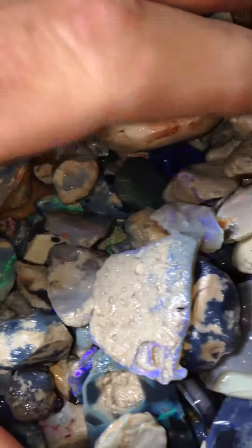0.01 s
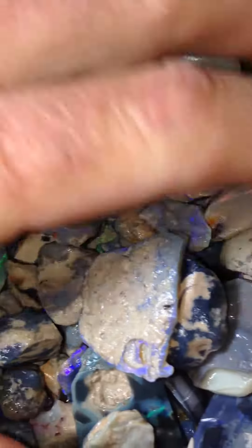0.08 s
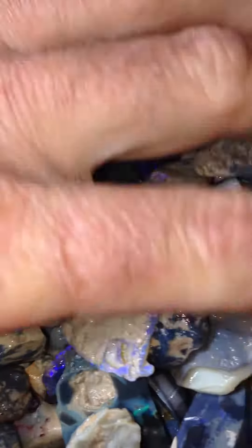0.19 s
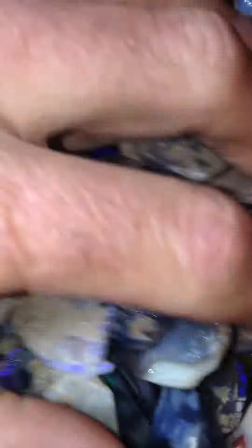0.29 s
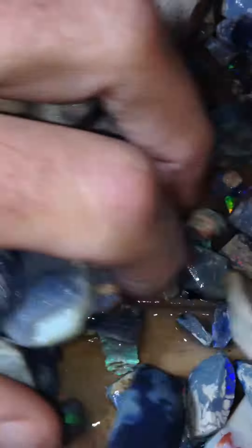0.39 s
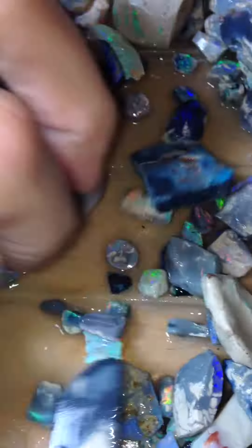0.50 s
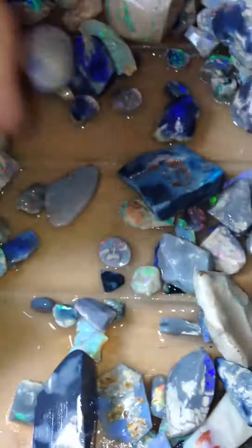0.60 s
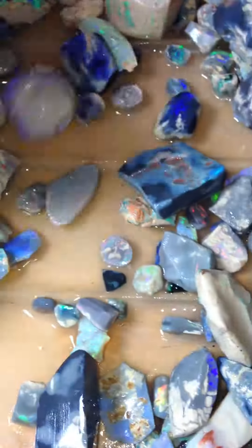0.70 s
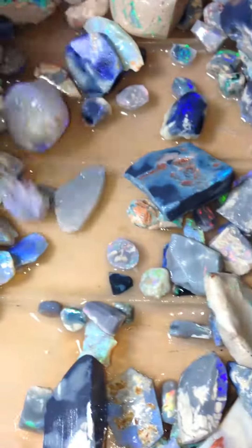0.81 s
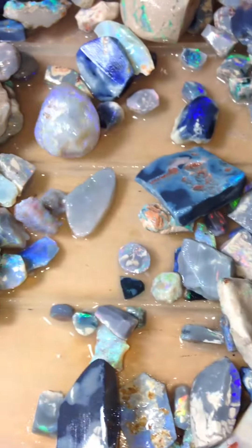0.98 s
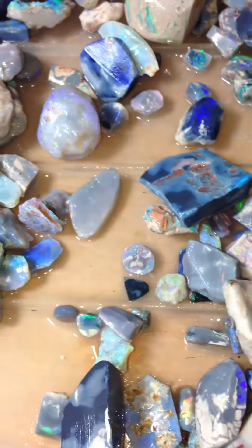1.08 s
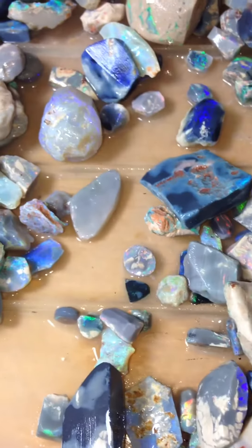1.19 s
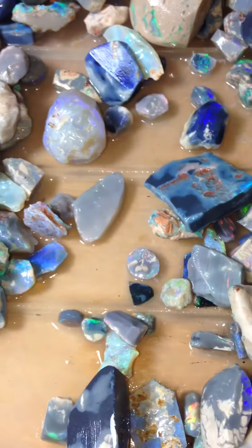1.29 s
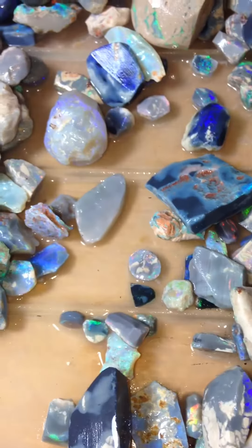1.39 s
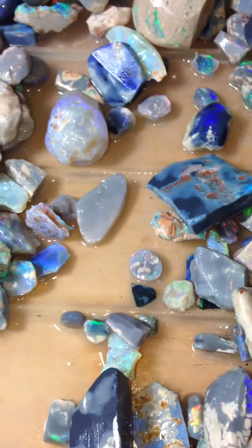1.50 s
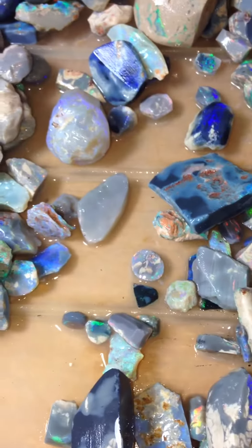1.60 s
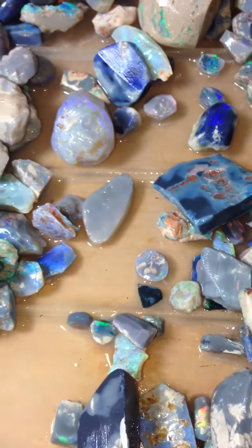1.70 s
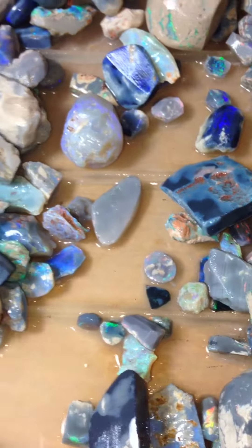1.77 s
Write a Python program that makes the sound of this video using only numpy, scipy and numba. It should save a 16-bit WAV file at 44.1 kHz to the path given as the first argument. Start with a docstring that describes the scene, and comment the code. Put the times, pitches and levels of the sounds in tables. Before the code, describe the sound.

Hard stones click quietly at first, with sharper clacks and a brief ringing scrape from 0.2 seconds. At about 0.37 a dense, loud, grating rush of stones sweeps over the hollow wooden box floor, easing by 0.65. Bright separate clacks and rattles follow, with very high glassy pings around 0.9 to 1.2. It thins near 1.3, then a smaller cluster clicks around 1.45 to 1.6 and sparse ticks remain. Close, small room, faint hiss.

```python
"""Hard stones clatter and grate as a hand rakes them over the floor of a wooden box, close to a phone.
Thousands of tiny collisions, each a decaying sine, make the raking; a dragged stone rings through it.
Loud clacks stand out, each amid a fading rattle, and a glassy chip pings very high as it tumbles.
The box floor drums and booms on its own modes, in a small room with a short tail and faint hiss."""
import sys
import numpy as np
from scipy import signal
from scipy.io import wavfile
from numba import njit

SR = 44100
rng = np.random.default_rng(int(sys.argv[2]) if len(sys.argv) > 2 else 0)


def persist_wave(psi):
    """Save psi, clipped to +-1, as 16-bit WAV."""
    counts = np.round(np.clip(psi, -1, 1) * 32767).astype(np.int16)
    wavfile.write(sys.argv[1], SR, np.atleast_2d(counts).T)


def gain_from_db(level_db):
    """Convert decibel levels to linear amplitude factors (20 dB per decade)."""
    decades = np.asarray(level_db, float) / 20
    return 10 ** decades


N = 79380  # 1.8 s

# Strength of the raking: (time [s], large stones [dB], middle stones [dB], small stones [dB], grit [dB],
# drumming of the box floor [dB], boom of the box floor [dB])
RAKE_LEVELS = [(0.0, -40, -41, -38, -39.5, -50, -52), (0.084, -32, -36, -36.5, -42.5, -60, -47),
               (0.124, -42, -51, -47.5, -68, -53, -54), (0.19, -40, -50.5, -47.5, -53, -54, -49),
               (0.23, -34, -29, -29.5, -38, -62, -60), (0.25, -25.5, -31, -32.5, -38, -52, -48),
               (0.32, -38.5, -27.5, -32, -43, -42, -49), (0.386, -23, -15.5, -16.5, -20.5, -31, -38.5),
               (0.456, -24.5, -21, -18.5, -23, -38.5, -36), (0.51, -26.5, -20.5, -19, -23.5, -35.5, -38),
               (0.576, -29, -26.5, -23, -31, -32, -40), (0.65, -31.5, -28, -24.5, -33, -36, -49),
               (0.676, -33, -32.5, -32, -33, -45, -40), (0.7, -38, -32, -30.5, -35, -35.5, -53),
               (0.732, -36.5, -34, -31.5, -31, -41, -53), (0.776, -34, -32, -27, -30.5, -36.5, -66),
               (0.826, -32.5, -31, -25.5, -32, -31, -42), (0.852, -33.5, -32, -28.5, -31, -39, -44),
               (0.982, -33.5, -34, -23.5, -32.5, -41, -62), (1.002, -43, -30.5, -32.5, -31, -32, -63),
               (1.066, -42, -28.5, -26.5, -33, -29.5, -66), (1.082, -26.5, -34, -34, -33, -68, -67),
               (1.098, -36.5, -33.5, -35, -31.5, -34.5, -53), (1.212, -36.5, -32.5, -30, -39, -55, -51.5),
               (1.252, -45, -40.5, -41, -56, -40.5, -42), (1.288, -40.5, -40.5, -43.5, -87, -59, -54),
               (1.418, -46.5, -46.5, -48.5, -56, -47, -55), (1.458, -45, -37, -36.5, -37, -42, -40),
               (1.518, -44, -36, -29, -38, -45.5, -50), (1.584, -40, -34.5, -39, -53, -52, -45),
               (1.608, -33, -40.5, -32.5, -54, -34.5, -50), (1.634, -46.5, -38, -44, -60, -60, -50),
               (1.668, -37.5, -36.5, -35.5, -62, -34.5, -50), (1.704, -45.5, -44, -48, -73, -60, -53),
               (1.758, -41, -36.5, -37.5, -60, -54, -59), (1.8, -41, -36, -46, -42, -56, -46)]
# Modes of the wooden box floor: (frequency [Hz], relative level [dB], decay by 60 dB [s])
BOX_MODES = [(132, -10, 0.29), (173, -8.5, 0.12), (280, -9, 0.032), (318, -38, 0.029), (418.4, -2, 0.048),
             (494, -3, 0.033), (640, -32, 0.059), (830, 3.5, 0.027), (867, 5.5, 0.061), (1129, 10.5, 0.021)]


@njit
def rings(start, hz, t60, size):
    """Sum of decaying sines, one for each collision; t60 is the time to fall by 60 dB."""
    out = np.zeros(N + 1)
    for k in range(len(start)):
        turn = np.exp(complex(-np.log(1000) / (t60[k] * SR), 2 * np.pi * hz[k] / SR))
        state = complex(size[k], 0.)
        first = max(int(start[k] * SR), 0)
        for j in range(first, min(N, first + int(t60[k] * SR))):
            out[j] += state.imag
            state *= turn
    return out[:N]


def struck(modes, times, sizes):
    """Every blow rings all modes of one object, each with a fresh strength."""
    hz, db, t60 = np.array(modes, float).T
    blows, count = len(times), len(hz)
    fresh = 1 + .25 * rng.standard_normal((blows, count))
    strength = sizes[:, None] * gain_from_db(db) * fresh
    return rings(np.repeat(times, count), np.tile(hz, blows), np.tile(t60, blows), strength.ravel())


def unit(x):
    """Scale to rms 1."""
    return x / np.sqrt(np.mean(x ** 2))


def rake_gain(column):
    """Gain over time from a level column of the raking table."""
    table = np.array(RAKE_LEVELS)
    return gain_from_db(np.interp(np.arange(N) / SR, table[:, 0], table[:, column]))


def thin(x):
    """High-pass, as small stones radiate little low sound."""
    return signal.lfilter(*signal.butter(2, 440, "high", fs=SR), x)


def muffle(x, hz):
    """Gentle one-pole low-pass."""
    return signal.lfilter(*signal.butter(1, hz, fs=SR), x)


def rake():
    """Dense random collisions for each stone size, bunched by a shared surge; the box floor drums and booms."""
    # Stone sizes: (lowest pitch [Hz], highest pitch [Hz], collision rate [1/s],
    # mean cycles in two amplitude decay constants, size spread when calm [dB])
    stone_sizes = [(713, 1500, 1200, 4.3, 1), (1500, 4500, 2200, 4.8, 2.5), (4280, 9110, 3500, 3.24, 3.5),
                   (8330, 12550, 4000, 2.3, 5)]
    surge_step_db, surge_per_s = 2.5, 70  # collisions come in bunches
    rush_db, rush_soft_db, rush_grit = -31.5, 4.5, 0.63  # centre and softness of the change, least spread factor
    pitch_skew = 0.98  # below 1 the higher pitches of a size class are slightly commoner
    knots = rng.standard_normal(400)
    table = np.array(RAKE_LEVELS)

    def calm(t):
        """When many stones move at once (loud middle stones), the factor falls and sizes even out."""
        middle_db = np.interp(t, table[:, 0], table[:, 2])
        return rush_grit + (1 - rush_grit) / (1 + np.exp((middle_db - rush_db) / rush_soft_db))

    def surge_db(t):
        """Random wander of collision strength."""
        return surge_step_db * np.interp(t * surge_per_s, np.arange(len(knots)), knots)

    stones = 0
    for k, (lo, hi, rate, cycles, spread_db) in enumerate(stone_sizes):
        u = rng.random((12000, 4))
        t = np.cumsum(-np.log(1 - u[:, 0])) / rate
        hz = np.minimum(lo * (hi / lo) ** (u[:, 1] ** pitch_skew), .45 * SR)
        t60 = (.5 + u[:, 3]) * cycles * np.log(1000) / (2 * hz)
        size_db = calm(t) * (surge_db(t) - spread_db * np.log(1 - .993 * u[:, 2]))
        # a wide spread raises the mean power; this takes the rise back
        share = np.clip(calm(t) * spread_db * np.log(10) / 10, 0, .9)
        size = gain_from_db(size_db) * np.sqrt(1 - share) * (t < N / SR)
        stones = stones + unit(thin(rings(t, hz, t60, size))) * rake_gain(column=k + 1)

    u = rng.random((1500, 2))
    t = u[:, 0] * N / SR
    size = gain_from_db(-1.5 * np.log(1 - u[:, 1]))
    drum = unit(struck(BOX_MODES[2:6], t, size * gain_from_db(surge_db(t)))) * rake_gain(column=5)
    boom = unit(struck(BOX_MODES[:2], t, size)) * rake_gain(column=6)
    return stones + drum + boom


def drag():
    """Stick-slip jolts ring the dragged stone; flat stones of one size add a shared colour to the raking."""
    # A large stone dragged over the floor: (time [s], ringing pitch [Hz], level [dB])
    drag_path = [(.19, 950, -41), (.215, 1070, -37), (.25, 1155, -20), (.26, 1270, -42),
                 (.285, 1500, -24.5), (.3, 1500, -40), (.36, 1150, -33), (.44, 1110, -24),
                 (0.481, 1170, -35), (.545, 1177, -26), (0.601, 1160, -48)]
    stone_t60_s, stone_scatter = 0.029, 0.042  # scatter is of the log pitch
    slab_hz, slab_scatter, slab_t60_s = 3027, 0.075, 0.016
    slab_db = -7  # relative to the middle stones
    time, pitch, level = np.array(drag_path, float).T
    u, g = rng.random((3000, 3)), rng.standard_normal((3000, 2))
    t = u[:, 0] * N / SR
    hz = np.interp(t, time, pitch) * np.exp(stone_scatter * g[:, 0])
    level_db = np.interp(np.arange(N) / SR, time, level, left=-90, right=-90)
    stone = unit(rings(t, hz, stone_t60_s + 0 * t, u[:, 1] ** 2)) * gain_from_db(level_db)
    slabs = rings(t, slab_hz * np.exp(slab_scatter * g[:, 1]), slab_t60_s + 0 * t, u[:, 2] ** 4)
    return stone + unit(slabs) * gain_from_db(slab_db) * rake_gain(column=2)


def clacks():
    """A sharp main contact with three weaker short modes, amid a cluster of small ones; the box is knocked too."""
    # Clacks: (time [s], main mode level [dB], main pitch [Hz], low rattle level [dB],
    # middle rattle level [dB], high rattle level [dB], rattle fade to 1/e [ms])
    clack_table = [(0.0314, -19, 2020, -31.5, -32, -39, 3.8), (0.0459, -26, 4470, -35, -31, -35, 4),
                   (0.1272, -31, 3790, -56, -46, -48, 5), (0.1337, -34, 6680, -54, -50, -54, 3.2),
                   (0.1564, -26, 6250, -36, -36, -39, 6.9), (0.1627, -20, 10060, -33, -42, -28.5, 3.5),
                   (0.1998, -21, 1680, -35, -27, -38, 7.4), (0.2145, -13, 2350, -38, -31, -34, 10),
                   (0.2322, -18, 3790, -49, -35, -38, 7), (0.2482, -28, 1510, -27, -23.5, -26, 7.8),
                   (0.2545, -16, 4350, -26, -27, -30, 6.4), (0.264, -12, 8100, -30, -34, -31, 7.6),
                   (0.3011, -11, 2840, -30, -21.5, -22, 6.2), (0.3051, -9.5, 2400, -23.5, -22, -25, 5.5),
                   (0.3306, -20, 2580, -35, -26, -35, 5), (0.352, -14, 2100, -23.5, -14, -22, 7.7),
                   (0.3553, -8, 2090, -30, -27, -16, 6.1), (0.368, -5, 1670, -25, -19, -13, 3.7),
                   (0.6019, -7, 5600, -28, -19.5, -23, 5), (0.6223, -8, 3010, -23.5, -16.5, -13.5, 4.6),
                   (0.701, -22, 1560, -24, -25.5, -27, 4.5), (0.7261, -15, 2920, -30, -37, -28, 4.6),
                   (0.7473, -15.5, 3040, -28, -31, -32, 5.6), (0.7945, -8, 7750, -39, -34, -27, 2.3),
                   (0.8191, -11, 3100, -24, -41, -29, 6.2), (0.8845, -15, 6850, -27.5, -30, -19.5, 5.9),
                   (0.8933, -16, 6840, -41, -37, -30, 3.1), (0.922, -11, 6800, -37, -28, -30, 3.2),
                   (0.9285, 2, 8450, -35, -20.5, -18.5, 3.9), (0.933, -12, 3040, -25, -27, -34, 5.6),
                   (0.9592, -19, 5190, -27, -20, -24, 6.4), (0.9798, -11, 4500, -24, -32, -25, 3.3),
                   (1.0012, -26, 1640, -22, -18.5, -27, 6.1), (1.0105, -7, 1510, -27, -27, -19.5, 7.4),
                   (1.0263, -7, 8300, -33, -34, -21.5, 13), (1.0334, -18, 5340, -34, -31, -25, 5),
                   (1.0482, -15, 7100, -26, -37, -19.5, 5), (1.083, -11, 8100, -31, -20, -19.5, 2.9),
                   (1.0916, -13, 2300, -32, -32, -25, 6), (1.1066, -16, 4480, -25.5, -29, -34, 5.6),
                   (1.1491, -12, 6850, -38, -29, -22.5, 5), (1.1676, -16.5, 5400, -24, -20.5, -25.5, 15),
                   (1.2001, -15, 1960, -31, -29, -36, 5.7), (1.2188, -22, 4440, -41, -33, -40, 5),
                   (1.2318, -19, 3360, -34.5, -18, -39, 5.8), (1.2338, -10.5, 5700, -29, -29, -29, 4.3),
                   (1.2827, -19, 1900, -36.5, -44, -56, 5), (1.2952, -17, 5900, -37, -24, -33, 4.6),
                   (1.3394, -22, 4260, -32, -29.5, -41, 5), (1.3539, -29, 2640, -35, -36, -60, 6.8),
                   (1.4073, -25, 9000, -49, -40, -40, 7.8), (1.4287, -12.5, 7170, -41, -33, -29, 5.2),
                   (1.4411, -26, 2570, -30, -22.5, -30, 5), (1.4552, -7.5, 1870, -27, -27.5, -30, 5.7),
                   (1.4675, -14, 1800, -27, -25, -28, 2.9), (1.485, -10, 5560, -31.5, -32, -26, 4.6),
                   (1.5059, -4, 11400, -28.5, -31, -17, 2.8), (1.5229, -17, 5630, -29, -18.5, -29, 5),
                   (1.5332, -11, 6700, -27, -36, -32, 5), (1.546, -12, 3550, -30, -20, -32, 5.8),
                   (1.5504, -9, 5600, -32, -24, -25, 5.8), (1.5745, -16, 4160, -31.5, -47, -49, 5),
                   (1.6061, -26, 1540, -46, -30, -35, 4.1), (1.6406, -17, 9350, -33.5, -39, -41, 5),
                   (1.6598, -14.5, 2180, -32.5, -41, -46, 5), (1.6659, -18, 1850, -30, -20, -46, 2.3),
                   (1.7055, -24.5, 3050, -39.5, -39, -37, 7.8), (1.7235, -17.5, 3800, -42, -38, -40, 5),
                   (1.737, -22.5, 2400, -35, -37, -31.5, 5.8), (1.7575, -18, 4370, -40, -29, -44, 4),
                   (1.7833, -16, 2150, -28, -20.5, -26.5, 5)]
    # Rattle pitch ranges: (lowest [Hz], highest [Hz], one contact over the rattle level [dB], decay by 60 dB [s])
    rattle_bands = [(620, 1800, 2, .009), (1850, 5800, 6, 0.0061), (5100, 13750, 10, 0.004)]
    t60_at_4khz_s, pitch_scatter = 0.0034, 0.423  # scatter is of the log pitch
    rattle_span_s, lead_in = .018, .2  # lead_in: share of the contacts that come before the main one
    knock_db = -9.5  # box knock relative to the low rattle level
    t, db, hz, *rattle_db, fade_ms = np.array(clack_table, float).T[:, :, None]
    g = rng.standard_normal((len(t), 4))
    g[:, 0] = 0  # the main mode keeps its pitch
    pitch = np.clip(hz * np.exp(pitch_scatter * g), 800, 14000)
    size = gain_from_db(db + np.array([0, -16.5, -20, -13.5]))
    t60 = t60_at_4khz_s * np.sqrt(4000 / pitch)
    out = rings((t + 0 * g).ravel(), pitch.ravel(), t60.ravel(), size.ravel())
    for level_db, (lo, hi, over_db, contact_t60) in zip(rattle_db, rattle_bands):
        u = rng.random((len(t), 14, 3))
        late = rattle_span_s * (u[..., 0] - lead_in)
        distance_s = np.where(late < 0, -3 * late, late)  # swells three times as fast as it fades
        fade = np.exp(-1000 * distance_s / fade_ms)
        size = gain_from_db(level_db + over_db) * fade * (.5 + u[..., 2])
        pitch = lo * (hi / lo) ** u[..., 1]
        out = out + rings((t + late).ravel(), pitch.ravel(), contact_t60 + 0 * late.ravel(), size.ravel())
    knocks = struck(BOX_MODES[2:], t[:, 0], gain_from_db(rattle_db[0][:, 0] + knock_db))
    return thin(out) + knocks


def chip():
    """The glassy chip's high modes, one of them long; each landing is followed by two lighter touches."""
    # Landings of the chip: (time [s], level before the touch and mode levels [dB])
    landings = [(0.8844, -18), (0.9253, -27), (0.958, -16), (1.0171, -19), (1.0344, -35), (1.0824, -18),
                (1.0919, -18), (1.1473, -12), (1.2058, -17), (1.2204, -21), (1.297, -43), (1.5224, -28),
                (1.5508, -28), (1.7569, -47), (1.7833, -33)]
    # Modes of the chip: (frequency [Hz], relative level [dB], decay by 60 dB [s])
    chip_modes = [(14860, -5, 0.087), (14780, -9, .025), (14800, -5, .022), (14850, -10, .014),
                  (15400, -8, .014)]
    t, db = np.array(landings, float).T[:, :, None]
    late = np.array([0, .004, .012]) * (.5 + rng.random((len(t), 3)))
    size = gain_from_db(db + np.array([-4, -9, -15]))
    return struck(chip_modes, (t + late).ravel(), size.ravel())


def room(dry):
    """Short tail of a small room: the sound convolved with muffled, decaying noise."""
    t60_s, level_db, muffle_hz = 0.086, -18, 7350
    t = np.arange(SR // 3) / SR
    tail = muffle(rng.standard_normal(len(t)), muffle_hz) * 1000 ** (-t / t60_s)
    tail = tail * (t > .003)  # the first reflections arrive after 3 ms
    return gain_from_db(level_db) * signal.fftconvolve(dry, tail / np.sqrt(np.sum(tail ** 2)))[:N]


def hiss():
    """Faint steady background of muffled noise."""
    return gain_from_db(-57) * unit(muffle(rng.standard_normal(N), 1200))


def scene():
    """Stones, box and chip close by, with a short room tail over faint hiss."""
    dry = rake() + drag() + clacks() + chip()
    return (dry + room(dry) + hiss())[None]


def band_limit(x):
    """A steep low-pass at the top of the band."""
    return signal.sosfilt(signal.butter(12, 16650, fs=SR, output="sos"), x)


def record(dry):
    """The phone's microphone path trims the deep bass and the very top and rounds peaks."""
    x = signal.sosfilt(signal.butter(3, 85, "high", fs=SR, output="sos"), dry)
    x = .95 * np.tanh(x / .95)
    x = signal.sosfilt(signal.ellip(8, .2, 80, 15250, fs=SR, output="sos"), x)
    return band_limit(x)


dry = scene()
out = record(dry)
persist_wave(out)
```